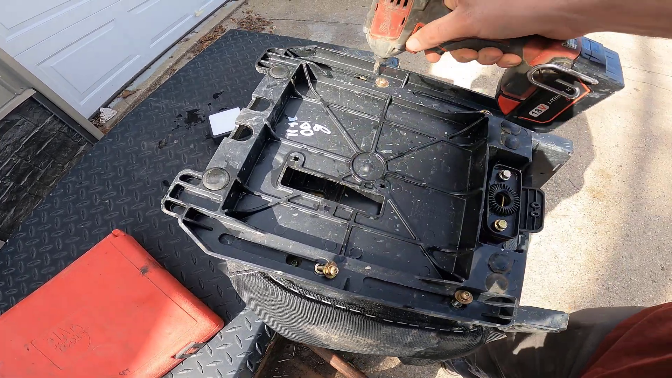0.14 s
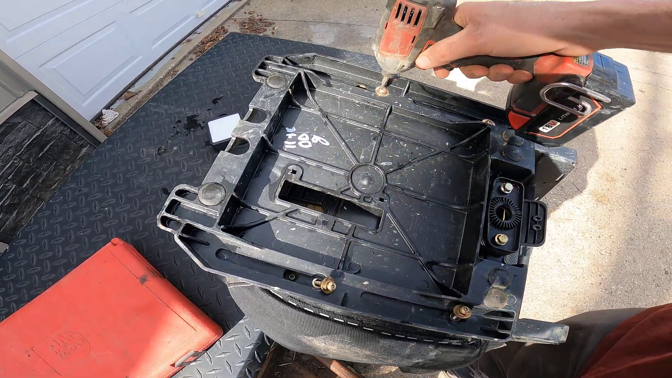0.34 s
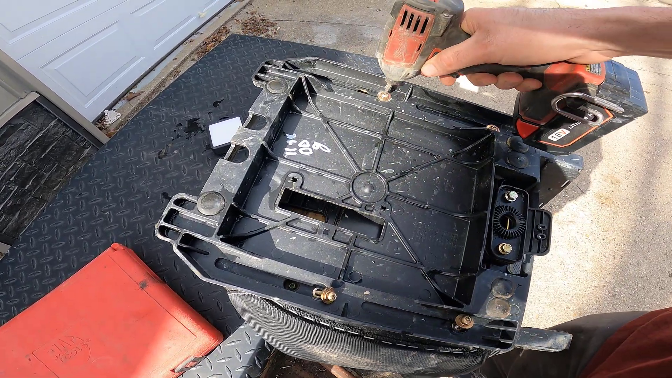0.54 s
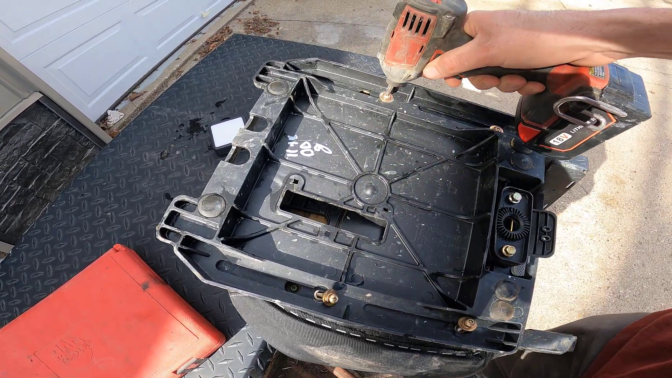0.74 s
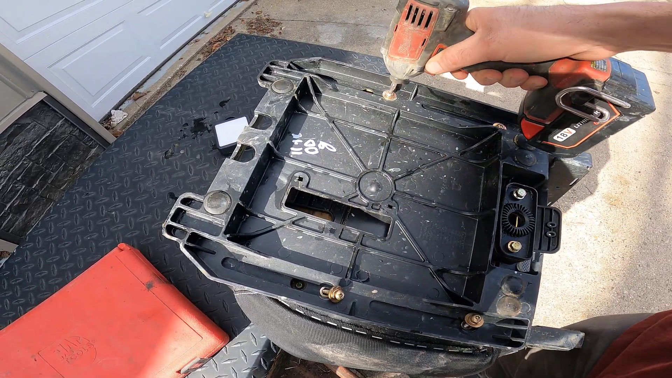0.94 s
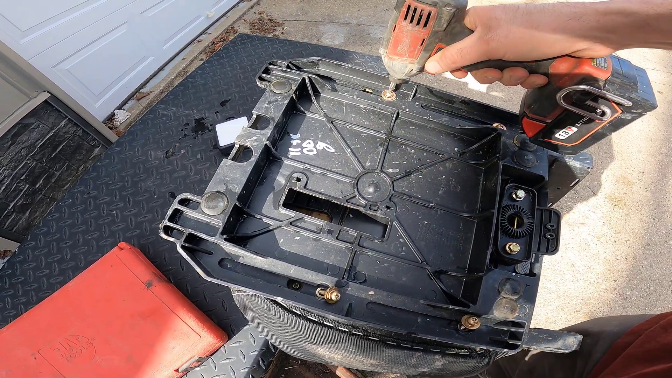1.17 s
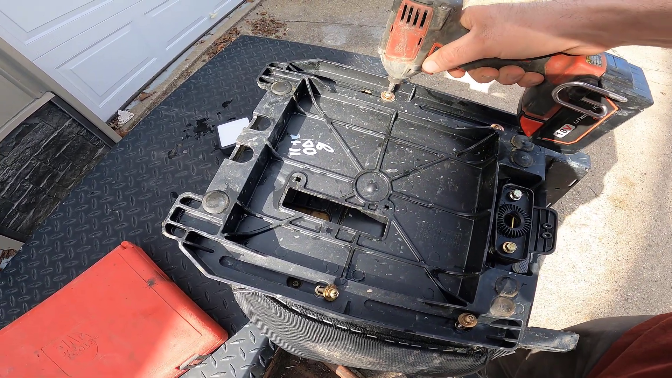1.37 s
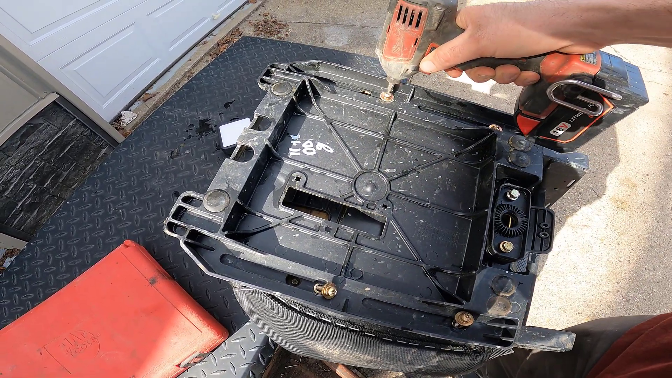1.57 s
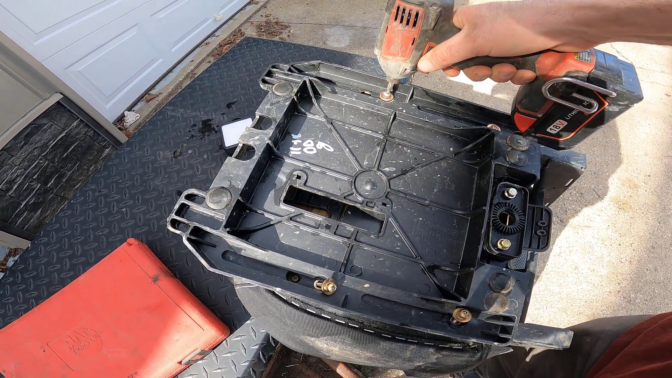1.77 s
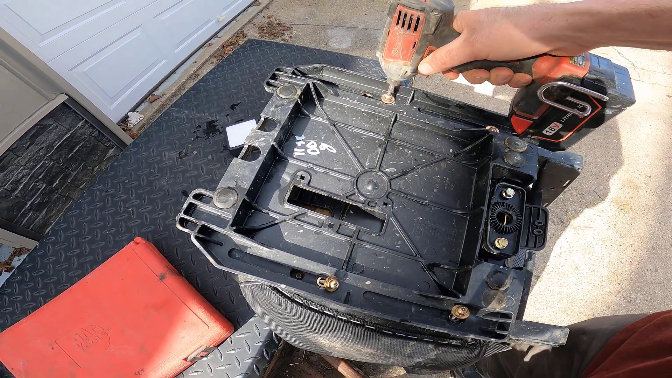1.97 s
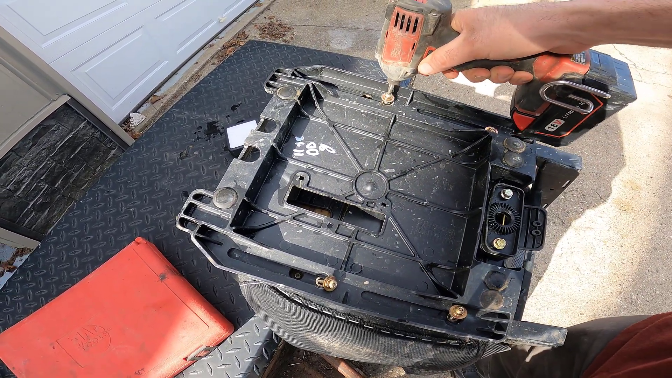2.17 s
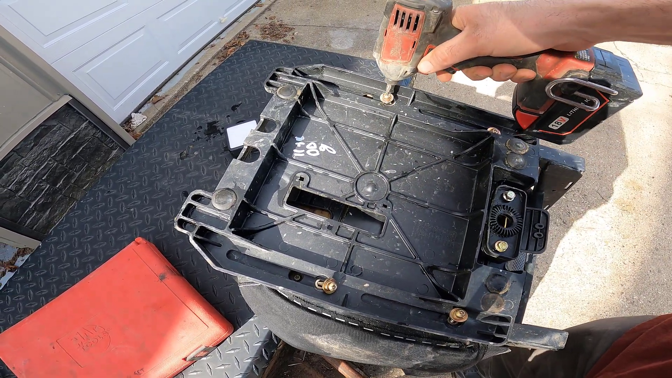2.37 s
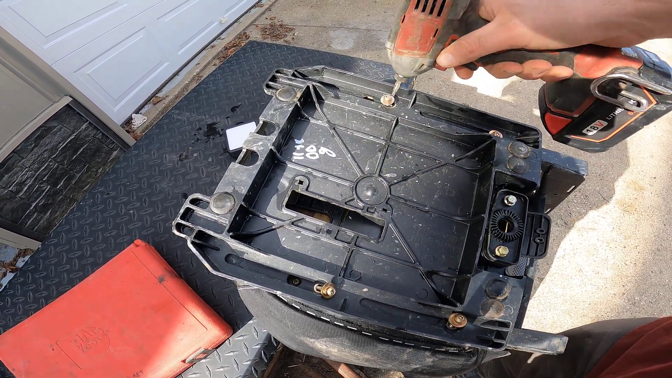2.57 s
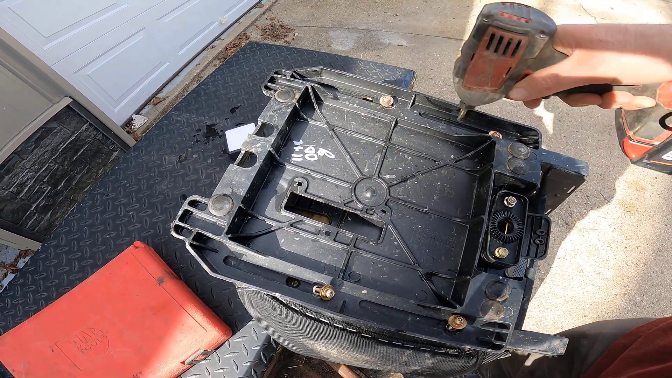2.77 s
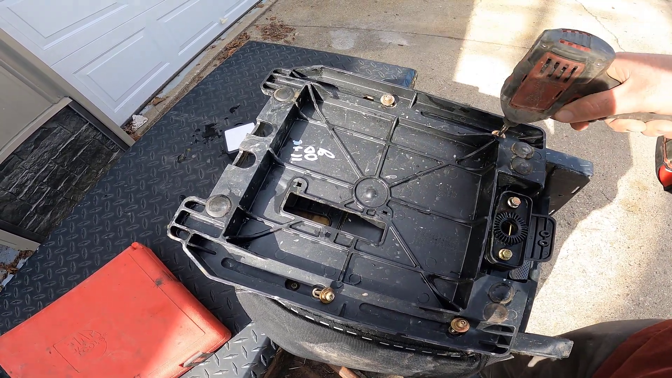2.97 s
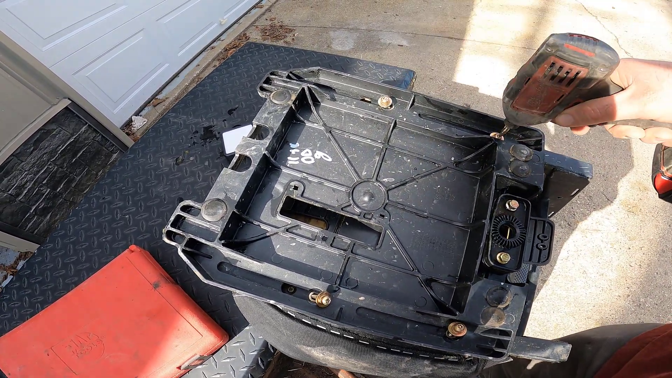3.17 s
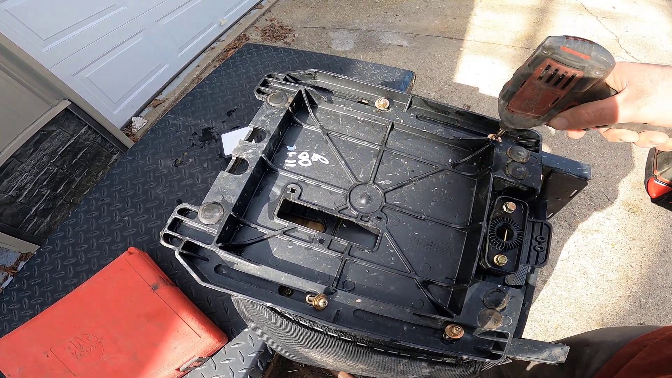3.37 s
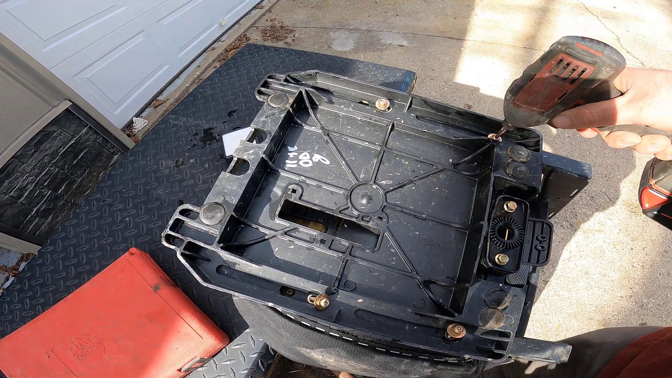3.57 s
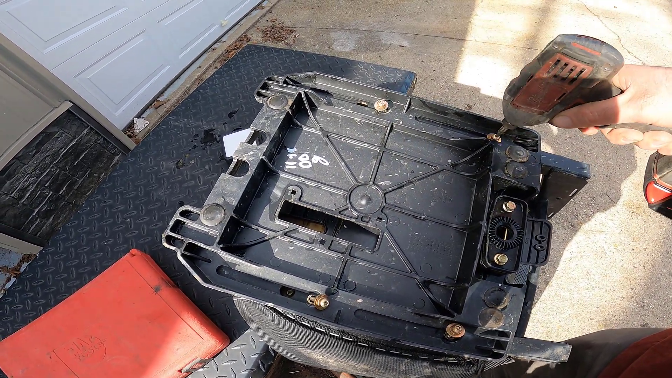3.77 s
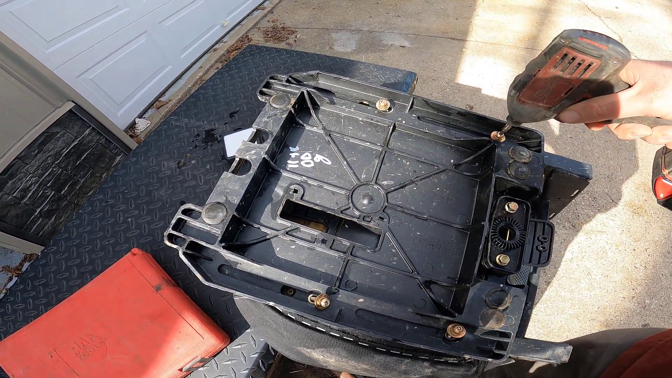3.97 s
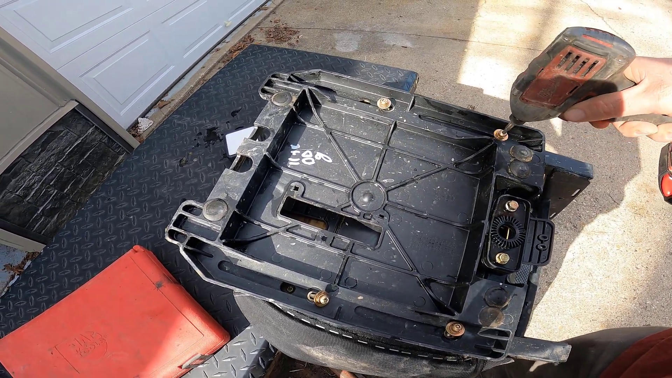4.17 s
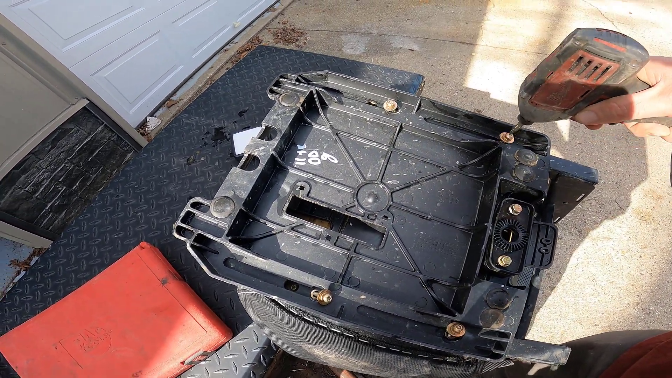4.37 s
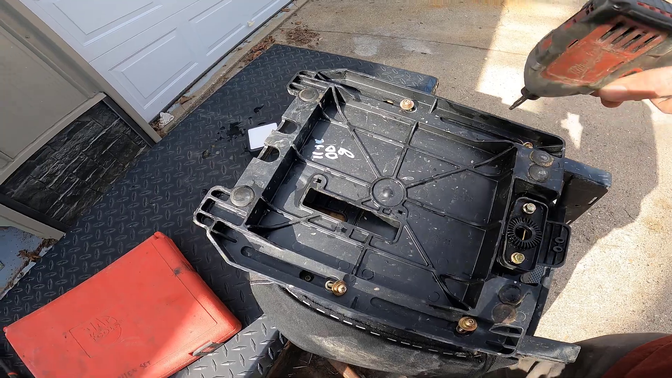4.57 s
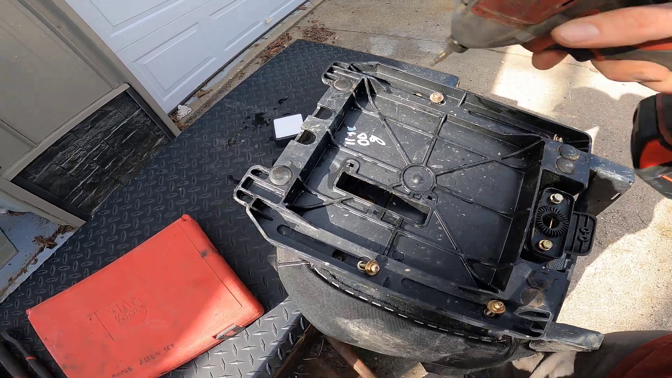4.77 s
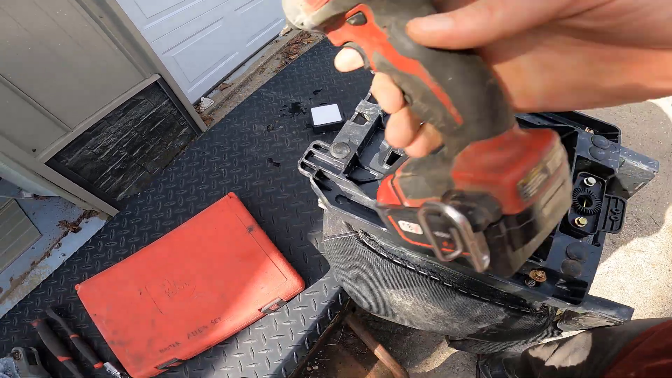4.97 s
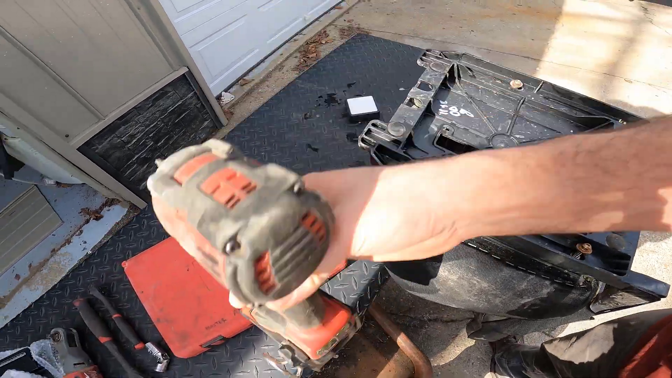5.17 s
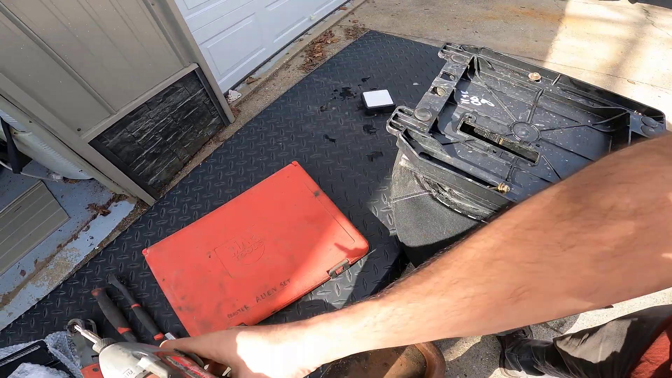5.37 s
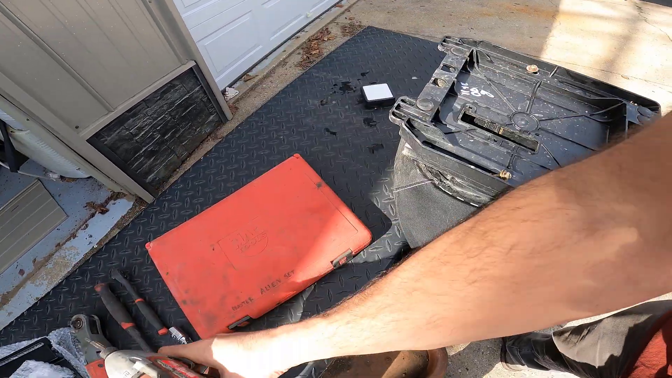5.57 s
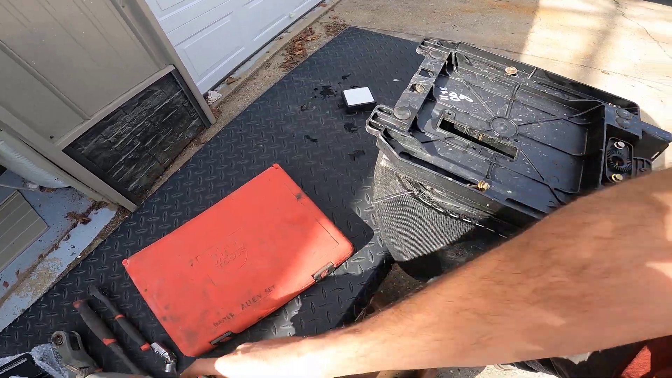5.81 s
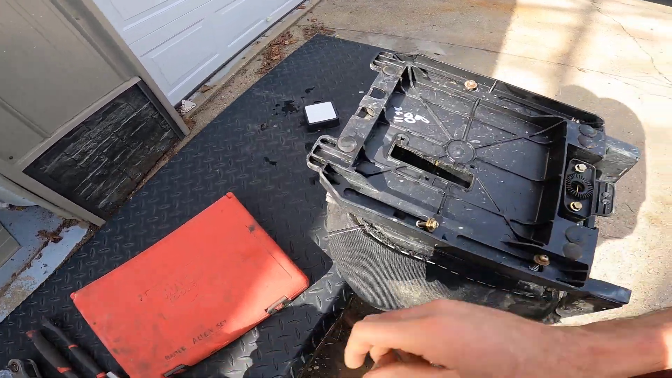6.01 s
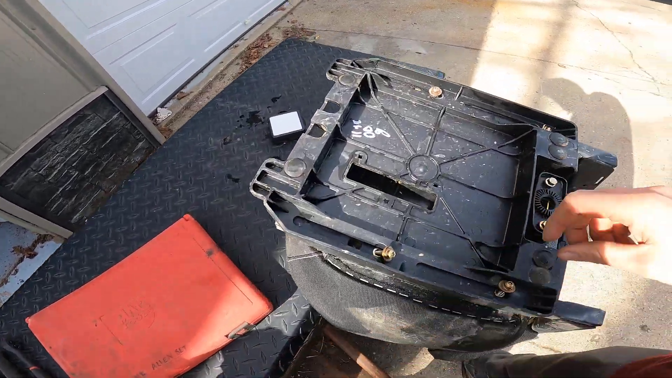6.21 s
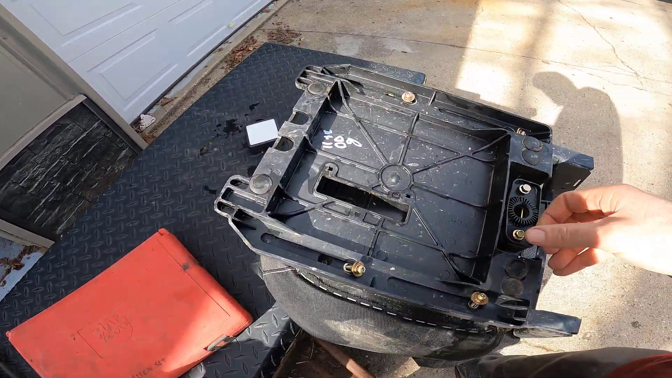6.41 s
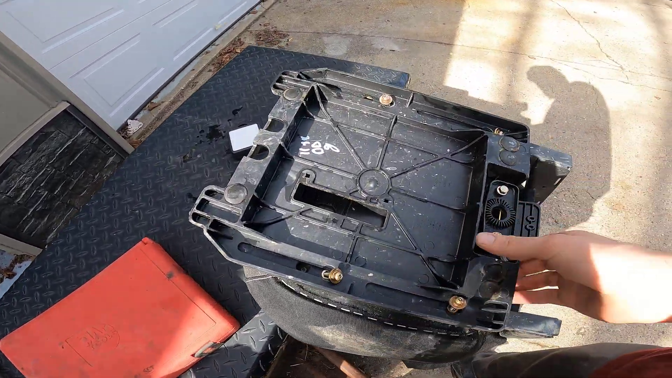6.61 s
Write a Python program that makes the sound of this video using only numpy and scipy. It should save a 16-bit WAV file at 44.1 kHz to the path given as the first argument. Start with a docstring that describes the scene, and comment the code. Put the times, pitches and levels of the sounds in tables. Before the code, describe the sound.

Knocks, a second of rapid metallic hammering, a pause, a short rattle opening into bright motor whine, then a tool clunks onto loose gear.

```python
"""A cordless impact driver backs two screws out of a moulded plastic base, outdoors and close by.
Its hammer, noise bursts of steel contact, also rings the base's modes until each screw lets go; its motor
is fan noise shaped by housing resonances plus gear-mesh partials. Noise-driven rings make the knocks of
bit, hand and tool, sliding resonances the scrapes, and noise cracks with modal booms the tool's drop onto
a pile of gear. Filtered noise makes the breeze and sleeve rustle."""
import sys
import numpy as np
from scipy import signal
from scipy.fft import rfft, irfft, next_fast_len
from scipy.io import wavfile
from scipy.ndimage import uniform_filter1d, map_coordinates

SR = 44100
rng = np.random.default_rng(int(sys.argv[2]) if len(sys.argv) > 2 else 0)


def pcm_store(signal):
    """Save signal as 16-bit PCM."""
    levels = np.round(np.clip(np.atleast_2d(signal), -1, 1) * 32767)
    wavfile.write(sys.argv[1], SR, levels.astype(np.int16).T)


N = 293132

# modes of the plastic base: [f/Hz, level/dB, t60/s]
BASE_MODES = [(114, -10, 0.15), (158, 4, 0.069), (214, -1.5, 0.09), (272.2, -2, 0.063), (345, 1, 0.07),
              (472, -14, 0.08), (779, -16, 0.0056), (955, -8, 0.05)]
# spectrum of steel on steel: [f/Hz, level/dB]
STEEL_SPECTRUM = [(290, -43.5), (500, 3.5), (537, -22.5), (586, -6), (968, 1.5), (1240, -3), (1530, -1),
                  (2930, -5.5), (5200, -5.5), (10200, -16.5), (12900, -27), (15500, -62.5)]
# spectrum of a tick or a scrape's hiss: [f/Hz, level/dB]
TICK_SPECTRUM = [(500, -22), (1500, 5), (4000, 3), (7500, -4.5), (11000, -33), (15000, -70)]


def gain_of(db):
    """Level law: decibels to amplitude ratio."""
    return 10 ** (np.asarray(db) / 20)


def evened(x):
    """Power normalisation: scales to rms 1."""
    return x / np.sqrt(np.mean(x ** 2) + 1e-20)


def read(points, hz):
    """Interpolates a table linearly over log frequency."""
    f, value = np.transpose(points)
    return np.interp(np.log(hz + 1), np.log(f + 1), value)


def add(mix, s, sound):
    """Superposition: adds a sound to the mix from time s."""
    part = mix[..., round(s * SR):][..., :sound.shape[-1]]
    part += sound[..., :part.shape[-1]]


def colour(x, spectrum):
    """Zero-phase linear filtering by a magnitude spectrum, to rms 1 for a white input."""
    size = 2 * next_fast_len(len(x) // 2 + 2048)
    shape = gain_of(read(spectrum, np.fft.rfftfreq(size, 1 / SR)))
    return irfft(rfft(x, size) * evened(shape))[:len(x)]


def resonate(x, hz, width):
    """Heterodyne resonator: shifts the curve hz down to zero, smooths, and shifts back."""
    turn = np.exp(2j * np.pi * np.cumsum(hz * np.ones(len(x))) / SR)
    r = np.exp(-np.pi * width / SR)
    return 2 * (turn * signal.lfilter([1 - r], [1, -r], x / turn)).real


def ring(modes, detune=0., contact=.0015):
    """Modal impulse response to one soft blow, peak 1; a body this small radiates no deep bass."""
    t = np.arange(SR // 2) / SR
    shift = 1 + detune * rng.standard_normal(len(modes))
    out = np.zeros(len(t))
    for (hz, db, t60), k in zip(modes, shift):
        out += gain_of(db - 60 * t / t60) * np.sin(2 * np.pi * hz * k * t)
    # a longer contact rounds off the treble
    out = np.convolve(out, np.hanning(round(contact * SR) + 3))[:len(t)]
    high_pass = signal.butter(2, .95 * modes[0][0], "high", fs=SR)
    out = signal.lfilter(*high_pass, out) * np.cos(np.pi * t) ** 2
    return out / abs(out).max()


def wander(size):
    """Low-pass random process: noise averaged twice over size samples, rms 1."""
    return evened(uniform_filter1d(uniform_filter1d(rng.standard_normal(N), size), size))


def air():
    """Turbulent noise: lumpy breeze and a soft rustle, partly uncorrelated between the two ports."""
    # mean levels: [t/s, breeze level/dB, rustle and yard hiss level/dB]
    air_levels = [(0, -50.5, -74), (.3, -49.5, -65), (.85, -44, -55), (2.4, -52, -60), (2.55, -57, -67.5),
                  (2.901, -56.5, -73.5), (3.3, -49, -69.5), (3.55, -47, -59), (4.499, -49, -50),
                  (4.701, -54.5, -71.5), (4.85, -47.5, -59), (5.05, -45.5, -51.5), (5.35, -45, -54),
                  (5.601, -46.5, -61), (6.101, -47.5, -62), (6.449, -49.5, -67), (6.56, -38, -60),
                  (6.65, -46, -59)]
    # spectrum of the breeze: [f/Hz, level/dB]
    breeze_spectrum = [(12, -26.5), (20, 7), (92, -4), (154, -3), (239, -12.5), (407, -19), (583, -22.5),
                       (850, -44), (1100, -47.5), (1870, -120)]
    # spectrum of the rustle and hiss: [f/Hz, level/dB]
    rustle_spectrum = [(520, -37.5), (880, -2.5), (1070, 3.5), (1550, -0.5), (1870, -2), (3810, -4.5),
                       (5030, -8.5), (6070, -8), (12500, -27.5), (16200, -57.5), (22000, -120)]
    s, breeze_db, rustle_db = np.transpose(air_levels)
    layers = ((breeze_spectrum, breeze_db, .35, 2.5), (rustle_spectrum, rustle_db, .9, 1.2))
    out = np.zeros((2, N))
    for spectrum, db, apart, lumps_db in layers:
        shared, left, right = (colour(v, spectrum) for v in rng.standard_normal((3, N)))
        level = gain_of(np.interp(np.arange(N) / SR, s, db) + lumps_db * wander(size=1500))
        both = evened(shared + apart * np.array([left, right]))
        out += level * both * gain_of([[-1.], [1.]])
    return out


def knocks():
    """Impact excitation: a bright tick, a short ring around its centre, the base's thud and the bit's modes."""
    # knocks and clicks of bit, hand and tool, with a few crisp hammer cracks:
    # [t/s, ring level/dB, centre f/Hz, thud level/dB, tick level/dB]
    knock_rows = [(0.336, -30, 1520, -40, -40.5), (.379, -23, 800, -14, -30),
                  (.536, -37.5, 900, -28.5, -57), (.568, -36, 845, -24.5, -51.5),
                  (.584, -21, 800, -10.5, -19.5), (.701, -32, 700, -23.5, -48), (.715, -9, 710, -6.5, -15),
                  (.808, -58, 1610, -48.5, -37), (.899, -9, 1090, -11.5, -5), (.912, -6, 1410, -2, -7.5),
                  (2.13, -13, 1720, -13.5, -20), (2.14, -13.5, 1370, -20.5, -13.5),
                  (2.161, -17, 1370, -24.5, -19), (2.404, -40, 2740, -57, -41),
                  (2.431, -42.5, 1660, -37.5, -43.5), (2.492, -61, 1750, -72, -40),
                  (3.082, -37, 1030, -62, -34), (3.147, -23, 990, -34, -32.5), (3.193, -39, 860, -42, -54),
                  (3.266, -38, 960, -38.5, -59), (3.3, -42, 950.7, -34, -63), (3.31, -43, 1020, -27.5, -45),
                  (3.37, -31, 950, -23.5, -58), (3.398, -4.5, 850, -15, -14.5),
                  (3.437, -36.5, 1000, -33, -44), (3.492, -41, 1490, -42, -44),
                  (3.585, -42, 5000, -48, -33.5), (3.602, -9, 1350, -21.5, -10.5),
                  (3.64, -7, 5500, -14, -9), (3.669, -6, 5000, -30, -9), (3.709, -9, 1400, -16, -16),
                  (4.239, -12, 5797, -18.5, -33), (4.289, -13, 5620, -18.5, -33),
                  (4.338, -19, 5550, -20.5, -20), (4.425, -14, 1590, -29, -21),
                  (4.542, -29, 970, -51, -22.5), (4.562, -31, 6230, -41, -49), (4.622, -43, 950, -60, -57),
                  (4.768, -35, 1010, -58.5, -53.5), (4.834, -26.5, 6230, -60, -43),
                  (4.897, -50, 1040, -58, -40), (5.106, -41, 1110, -47, -46), (5.161, -33, 3820, -44, -45),
                  (5.179, -41, 1590, -53, -42), (5.397, -41, 2260, -60, -56), (5.468, -38, 3700, -56, -48),
                  (5.496, -37, 3500, -46, -59), (6.069, -40, 5370, -48, -58), (6.268, -48, 5000, -60, -62),
                  (6.532, -30, 1170, -30.5, -34), (6.551, -28.5, 1710, -32, -40),
                  (6.571, -31.5, 805, -32, -43), (6.583, -41, 851, -33, -45)]
    # modes of the steel bit: [f/Hz, level/dB, t60/s]
    bit_modes = [(2708, -3, 0.042), (4120, -4.5, 0.034), (6120, -2.5, 0.01), (6560, -22, .15)]
    ring_cycles, tick_t60_s = 39, .024  # the ring's excitation loses 60 dB in so many cycles
    tail_db, tail_t60_s = -23.5, .21  # a faint longer tail of the surroundings follows each knock
    bit_db = -10.5  # the bit's ring beside each tick
    out, t = np.zeros(N), np.arange(6000) / SR
    tail = gain_of(tail_db - 60 * t / tail_t60_s)
    for s, ring_db, hz, thud_db, tick_db in knock_rows:
        noise = rng.standard_normal(len(t)) * np.minimum(t / .0008, 1)
        tick = colour(noise * (gain_of(-60 * t / tick_t60_s) + tail), TICK_SPECTRUM)
        excitation = noise * (gain_of(-60 * t * hz / ring_cycles) + tail)
        tone = resonate(resonate(excitation, hz, .4 * hz), hz, 1.7 * hz)
        thud = ring(BASE_MODES, detune=.085)[:len(t)] * gain_of(-60 * t / .23)
        bit = ring(bit_modes, detune=.011, contact=.00015)[:len(t)]
        add(out, s, gain_of(tick_db) * tick / abs(tick).max())
        add(out, s, gain_of(ring_db) * tone / abs(tone).max())
        add(out, s, gain_of(thud_db) * thud + gain_of(tick_db + bit_db) * bit)
    return out


def scrapes():
    """Stick-slip friction: uneven slips over plastic ring a sliding band."""
    # short drags: [t/s, length/s, first f/Hz, last f/Hz, level/dB]
    scrape_rows = [(0.574, .014, 5000, 6500, -46), (3.363, 0.052, 980, 990, -42),
                   (3.604, .03, 1490, 1694, -28), (4.615, 0.072, 970, 895, -56.5),
                   (4.966, 0.076, 1310, 1550, -55), (5.608, 0.025, 900, 890, -45.5),
                   (5.866, 0.074, 3880, 3500, -56), (5.875, .12, 2010, 2010, -64),
                   (6.572, 0.038, 2900, 2900, -50.5), (6.574, 0.022, 5500, 5540, -49)]
    relative_width, hiss_db = .13, -13  # bandwidth as a fraction of the first frequency
    slips_per_s, slip_spread_db = 700, 3.5
    out, t = np.zeros(N), np.arange(8000) / SR
    for s, length, first_hz, last_hz, db in scrape_rows:
        along = np.clip(t / length, 0, 1)
        strength = gain_of(slip_spread_db * rng.exponential(1, len(t)).clip(0, 2.5))
        slips = (rng.random(len(t)) < slips_per_s / SR) * strength
        envelope = np.sqrt(np.sin(np.pi * along).clip(0))
        grit = (evened(slips) + .6) * rng.standard_normal(len(t)) * envelope
        band = resonate(grit, first_hz + (last_hz - first_hz) * along, relative_width * first_hz)
        sound = evened(band) + gain_of(hiss_db) * evened(colour(grit, TICK_SPECTRUM))
        # rms was taken over the whole buffer, so scale by the drag's share of it
        add(out, s, gain_of(db) * sound * np.sqrt(length / t[-1]))
    return out


def motor(pull, whir_spectrum, housing):
    """Source-filter radiation: fan noise in the housing, phase-diffusing gear partials, the base shaken."""
    # gear mesh rate, hunting as the screw binds and frees: [t/s, f/Hz]
    mesh_rate = [(2.09, 800), (2.15, 928), (2.32, 945), (3.72, 850), (3.78, 922), (3.92, 938), (3.96, 926),
                 (4.06, 940), (4.12, 958), (4.21, 955), (4.26, 965), (4.385, 972), (4.46, 880)]
    # whine partials: [multiple of the mesh rate, level/dB, blur width/Hz]
    mesh_partials = [(1.77, -5, 40), (2, .5, 5), (3, -8, 15), (4, 1.5, 9), (4.2, -3, 60), (5.76, -4, 45),
                     (6, 2, 15)]
    spin_up_s, let_go_s = .025, .065
    brake_s, brake_curve = .1, 2.4  # the brake takes 60 dB off in brake_s
    surge_db, surge_s = 10.5, .07  # the motor draws hardest as it starts
    bite_s = .045  # the base starts to shake when the bit bites
    stuck_whir_db, stuck_whine_db = -5, -14  # while the screw holds
    out_db = -16.5  # the base quiets once the screw is out
    flutter_db, whine_fade_db_per_s = 2, -450  # each partial swells and fades; gears unload at release
    press, lets_go, screw_out, release, whir_db, whine_db, stuck_db, loose_db = pull
    t = np.arange(N) / SR
    stuck = np.clip(.5 - (t - lets_go) / let_go_s, 0, 1)
    braking_s = np.maximum(t - release, 0)
    starting = np.maximum(1 - (t - press) / spin_up_s, 0) ** 2
    on = gain_of(-60 * (starting + (braking_s / brake_s) ** brake_curve))

    whir_db = whir_db + stuck_whir_db * stuck + surge_db * np.exp(-abs(t - press) / surge_s)
    whine_db = whine_db + stuck_whine_db * stuck + whine_fade_db_per_s * braking_s
    bite = np.clip((t - press) / bite_s, 0, 1) ** 2
    shake_db = loose_db + (stuck_db - loose_db) * stuck * bite
    shake_db = shake_db + out_db * np.clip((t - screw_out) / let_go_s, 0, 1)

    noise = rng.standard_normal(N) * gain_of(2.0 * wander(size=60))
    whir = colour(noise, whir_spectrum)
    for hz, width, db in housing:
        whir += gain_of(db) * evened(resonate(noise, hz, width))

    mesh_hz = np.interp(t, *np.transpose(mesh_rate))
    turn = 2 * np.pi * np.cumsum(mesh_hz) / SR
    whine = np.zeros(N)
    for k, db, blur in mesh_partials:
        drift = np.cumsum(rng.standard_normal(N)) * np.sqrt(2 * np.pi / SR)  # random-walk phase
        level = gain_of(db + flutter_db * (wander(size=1200) - .5))
        whine += level * np.sin(k * turn + np.sqrt(blur) * drift)

    shake = evened(signal.oaconvolve(rng.standard_normal(N), ring(BASE_MODES)[:1500])[:N])
    whine = np.sqrt(2) * gain_of(whine_db) * whine
    return on * (gain_of(whir_db) * evened(whir) + whine + gain_of(shake_db) * shake)


def hammer(blows, clatter_db, rumble_db, contact, lag):
    """Repeated impact: steel contacts clatter, pushes excite the base's modes, the camera mount rumbles."""
    # contacts in one blow, cam lift, anvil strike, rebound, drag: [delay t/s, level/dB, decay length/s]
    contacts = [(-.0055, -8, 0.0046), (.003, 0, 0.0049), (0.01, -4.5, .0045), (0.02, -16, 0.0058)]
    # pushes on the base in one blow: [delay t/s, level/dB]
    pushes = [(-.0068, -13.5), (-.0036, -4.5), (.0032, -11.5), (.0108, -12.5), (.0178, -19)]
    contact_rise_s = .002
    # each steel contact favours its own band
    clang_low_hz, clang_high_hz, clang_relative_width, clang_db = 1200, 7600, .31, -2.5
    push_slack_s, slack_growth = .00015, .026  # later pushes land less evenly
    # below this the loose bit chatters on between the contacts
    chatter_hz, chatter_db, strike_mids_db = 2980, -4.5, 0
    number, *columns = np.transpose(blows)
    every_blow = np.arange(round(number[-1]) + 1)
    s, force_db = (np.interp(every_blow, number, c) for c in columns)
    clatter, weight, push = np.zeros(N), np.zeros(N), np.zeros(N)
    t = np.arange(900) / SR
    for at, db in zip(s, force_db):
        for delay, hit_db, length in contacts:
            slack, hard = rng.standard_normal(2)
            burst = gain_of(db + hit_db + .8 * hard) * np.minimum(t / contact_rise_s, 1)
            burst = burst * np.exp(-(t / length) ** 2)
            hz = clang_low_hz * (clang_high_hz / clang_low_hz) ** rng.random()
            noise = rng.standard_normal(len(t))
            clang = resonate(noise, hz, clang_relative_width * hz) * np.sqrt(2000 / hz)
            strike = burst * evened(noise + gain_of(clang_db) * clang)
            add(clatter, at + lag + delay + .0004 * slack, strike)
            add(weight, at + lag + delay, burst)
        for delay, push_db in pushes:
            slack, soft = rng.standard_normal(2)
            spread_s = push_slack_s + slack_growth * (delay - pushes[0][0])
            push[round((at + delay + spread_s * slack) * SR)] -= gain_of(db + push_db + 1.1 * soft)

    # a low rumble of the shaken camera mount follows the blows
    rumble = evened(resonate(rng.standard_normal(N), 45, 40)) * uniform_filter1d(weight, size=2600)
    low_pass = signal.butter(2, chatter_hz, fs=SR)
    chatter = gain_of(chatter_db) * rng.standard_normal(N) * uniform_filter1d(weight, size=900)
    chatter = chatter * gain_of(2.5 * wander(size=90))
    mids = signal.filtfilt(*low_pass, clatter)
    clatter = clatter - mids + gain_of(strike_mids_db) * mids + signal.filtfilt(*low_pass, chatter)
    steel = gain_of(clatter_db) * colour(clatter * gain_of(1.3 * wander(size=30)), STEEL_SPECTRUM)
    body = signal.oaconvolve(push, ring(BASE_MODES, contact=contact))[:N]
    return steel + body + gain_of(rumble_db) * rumble


def drop():
    """Inelastic bouncing: each impact cracks and booms in the pile; loose parts jumble and keep it rumbling."""
    # landing and bounces of the tool: [t/s, crack peak level/dB, boom level/dB]
    bounces = [(5.626, -8.5, -4), (5.638, -10, -9), (5.66, -34.5, -1.5), (5.677, -21, -31),
               (5.699, -25, -3.5), (5.714, -52, -12.5), (5.758, -27, -9.5), (5.812, -43, -23.5),
               (5.864, -26, -17)]
    # modes of the pile: [f/Hz, level/dB, t60/s]
    pile_modes = [(95, -2, 0.3), (125, -6, 0.1), (165, -4, 0.15), (228, -5, 0.22), (345, -9, 0.22),
                  (450, -13, 0.08), (620, -14, 0.025), (1110, 0.5, 0.035)]
    # spectrum of the jumbling parts: [f/Hz, level/dB]
    jumble_spectrum = [(240, -5), (400, -39.5), (543, -2), (577, -13), (1070, -1.5), (2360, -13.5),
                       (5390, -18), (10900, -43), (15500, -89.5)]
    jumble_s, jumble_db, settle_db_per_s = 5.627, -15, -90  # parts leap at the landing and settle
    hold_s, still_db_per_s = .088, -300  # then they fall still faster
    linger_db, linger_db_per_s = -28.5, -92.5  # the last bits trickle
    rumble_db, rumble_s = -19.5, .38  # the pile rumbles on, then dies away
    out, t = np.zeros(N), np.arange(SR // 2) / SR
    for s, peak_db, boom_db in bounces:
        crack = colour(rng.standard_normal(len(t)), STEEL_SPECTRUM) * gain_of(-60 * t / .03)
        boom = ring(pile_modes, detune=.04) * gain_of(-60 * t / .25)
        add(out, s, gain_of(peak_db) * crack / abs(crack).max() + gain_of(boom_db) * boom)

    since = np.arange(N) / SR - jumble_s
    landed = since > 0
    level = gain_of(jumble_db + settle_db_per_s * since + still_db_per_s * (since - hold_s).clip(0))
    level = (level + gain_of(linger_db + linger_db_per_s * since)) * landed
    grains = rng.standard_normal(N) * gain_of(3. * wander(size=50))
    jumble = level * evened(colour(grains, jumble_spectrum))
    pile_ring = ring(pile_modes[1:])[:1600]
    rumble = evened(signal.oaconvolve(rng.standard_normal(N), pile_ring)[:N])
    rumble = rumble * gain_of(1.6 * wander(size=500))
    return out + jumble + gain_of(rumble_db - 20 * (since / rumble_s) ** 2) * landed * rumble


def ports(x, lean):
    """Stereo cues: a near source reaches two ports with level and phase differences scaled by its lean."""
    # phase lead of the left port at lean 1: [f/Hz, phase/rad]
    port_lead = [(400, 0), (1500, 0.23), (3000, -1.32), (4300, -2.5), (4800, 0.14), (7000, 0.5),
                 (15000, 1.5)]
    # left over right at lean 1: [f/Hz, level/dB]
    port_balance = [(30, -9), (90, -0.6), (200, -0.5), (600, -3.5), (3000, -6), (6000, -5), (9000, 4),
                    (14000, -4.5)]
    hz = np.fft.rfftfreq(2 * next_fast_len(N // 2 + 1), 1 / SR)
    half = gain_of(lean * read(port_balance, hz) / 2) * np.exp(.5j * lean * read(port_lead, hz))
    return irfft(rfft(x, 2 * len(hz) - 2) * np.array([half, 1 / half]))[:, :N]


def sway(x):
    """Varying path difference: microphones and tool move a little, so the lag between the ports drifts."""
    sway_s = .000013  # rms drift of the lag
    shift = sway_s * SR * wander(size=4000) / 2
    return np.array([map_coordinates(v, [np.arange(N) + k * shift], order=3) for v, k in zip(x, (1, -1))])


def yard(x):
    """Early reflections: sparse random echoes off ground and walls, different for each port."""
    t = np.arange(6000) / SR
    sign = rng.choice([-1., 1.], (2, len(t)))
    sparse = rng.random((2, len(t))) < .05
    taps = sign * sparse * gain_of(-60 * t / .07) * (t > .001)
    taps = signal.lfilter(*signal.butter(1, 1200, "high", fs=SR), taps / np.linalg.norm(taps[0]))
    return signal.oaconvolve(x[None], taps, axes=1)[:, :N]


def scene():
    """Superposition of direct sound from tool, knocks and drop, their reflections, and the air."""
    # hammer pace and force on each screw, even between rows: [blow number, t/s, force level/dB]
    long_rattle = [(0, .9305, 1), (9, 1.1794, -.5), (12, 1.2637, -1), (23, 1.5876, -1.5), (35, 1.9327, -1),
                   (40, 2.083, -0.5)]
    short_rattle = [(0, 3.631, 1.5), (1, 3.668, -1), (2, 3.7, -2), (3, 3.746, -11)]  # the second screw gives after four blows
    # trigger pulls: [press t/s, screw lets go t/s, screw is out t/s, release t/s,
    # whir level/dB, whine level/dB, shake level stuck/dB, shake level loose/dB]
    pulls = [(.868, 2.12, 2.4, 2.32, -25, -42, -26, -42.5), (3.586, 3.745, 4.35, 4.41, -21, -32, -23, -39)]
    # whir spectra, vents seen side-on, then turned to the microphones: [f/Hz, level/dB]
    whir_first = [(290, -60), (500, -8), (839, -10), (1350, 4), (2500, -4.5), (3430, -1), (4380, -2),
                  (6830, -7.5), (12000, -35.5), (14000, -50.5), (15500, -102)]
    whir_second = [(290, -50), (500, -14), (827, -21), (1390, -5), (2400, -12), (3100, -9), (3960, -1),
                   (4570, -10), (5590, -2), (12000, -32.5), (13600, -42.5), (15500, -99)]
    # housing resonances in each pull: [f/Hz, width/Hz, level/dB]
    housing_first = [(1570, 250, -7), (3600, 410, -10), (5350, 400, -15), (7100, 600, -10.5)]
    housing_second = [(1000, 110, -16), (5545, 140, -14), (7280, 790, -9)]
    taps = knocks() + scrapes()
    first = motor(pulls[0], whir_first, housing_first)
    first += hammer(long_rattle, clatter_db=-9, rumble_db=-17, contact=.0015, lag=-.001)
    second = motor(pulls[1], whir_second, housing_second)
    second += hammer(short_rattle, clatter_db=-9, rumble_db=-22, contact=.0045, lag=-.003)
    fall = drop()
    near = ports(first, lean=.56) + ports(second, lean=.7) + ports(taps, lean=.29) + ports(fall, lean=-.22)
    return sway(near) + gain_of(-7) * yard(first + second + taps + fall) + air()


def record(dry):
    """Saturation and band limiting: soft overload on peaks, a capsule fading in the top octave, a cutoff."""
    edge_hz = 15730
    loud = 1.073 * np.tanh(dry / 1.131)
    capsule = signal.oaconvolve(loud, signal.firwin(21, 14000, fs=SR)[None], "same")
    band_limit = signal.firwin(511, edge_hz, window=("kaiser", 9), fs=SR)
    return signal.oaconvolve(capsule, band_limit[None], "same")


dry = scene()
out = record(dry)
pcm_store(out)
```